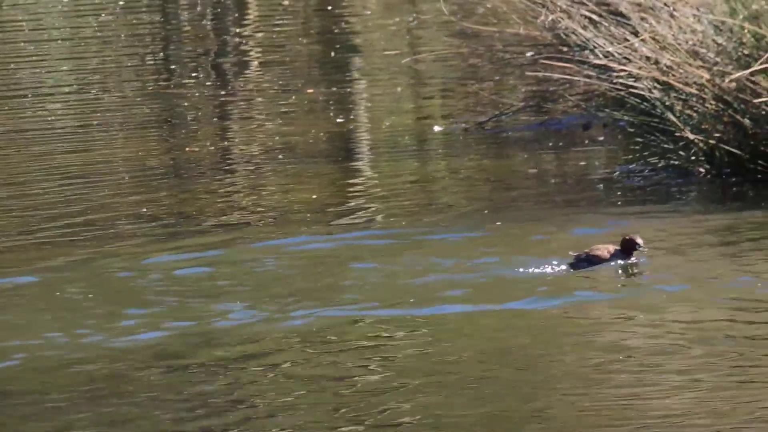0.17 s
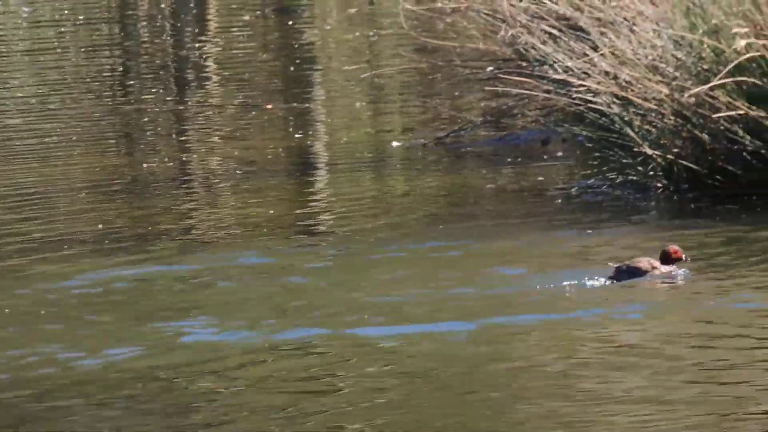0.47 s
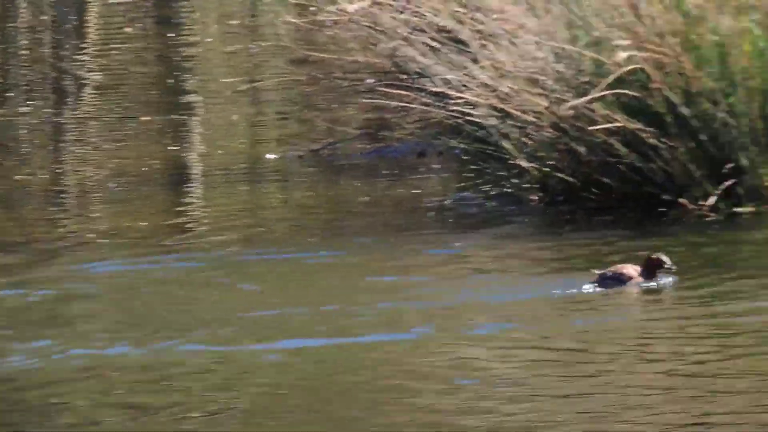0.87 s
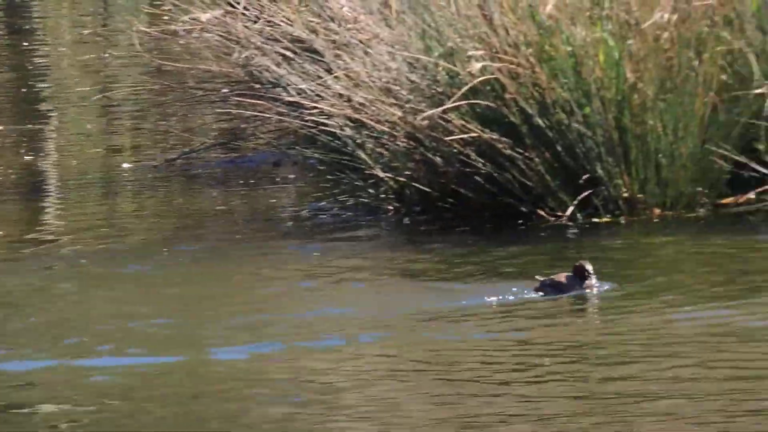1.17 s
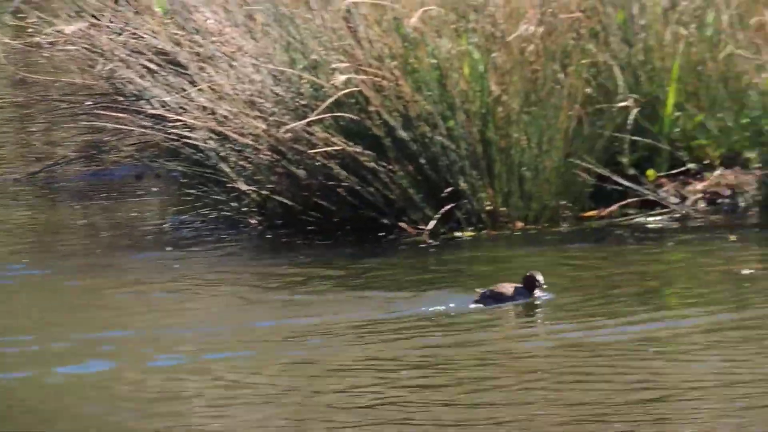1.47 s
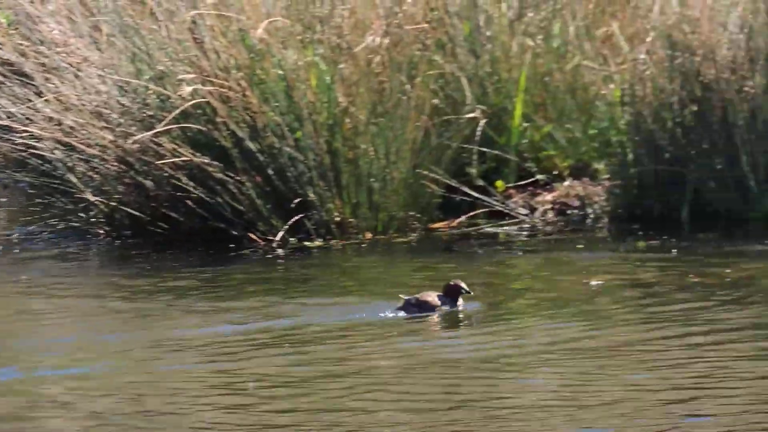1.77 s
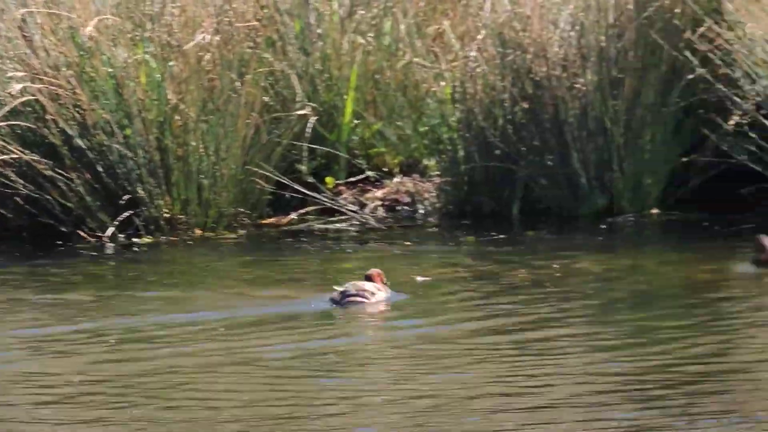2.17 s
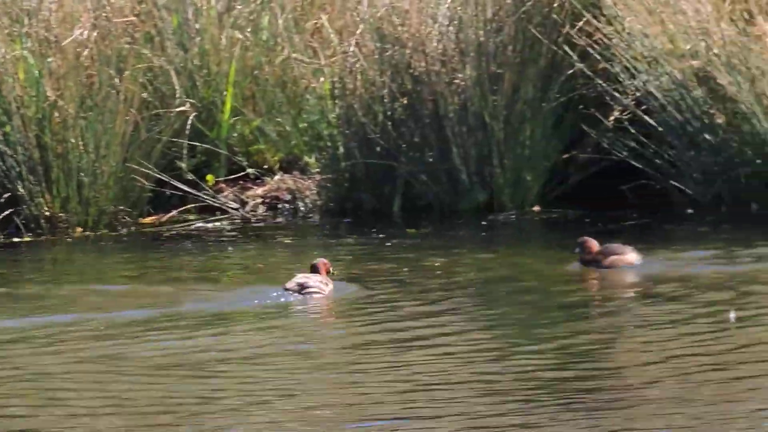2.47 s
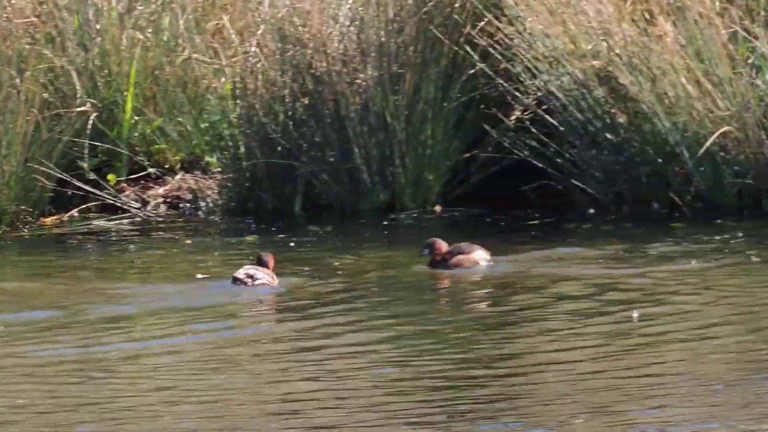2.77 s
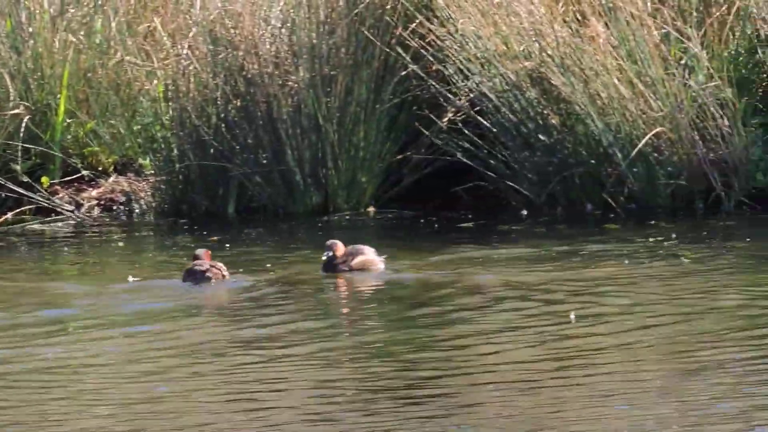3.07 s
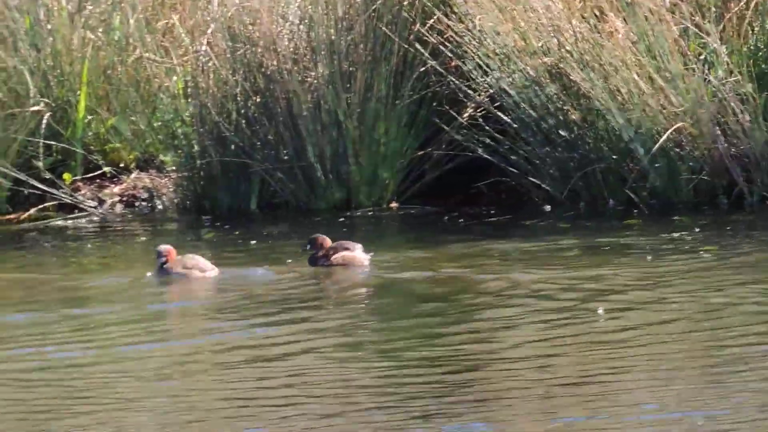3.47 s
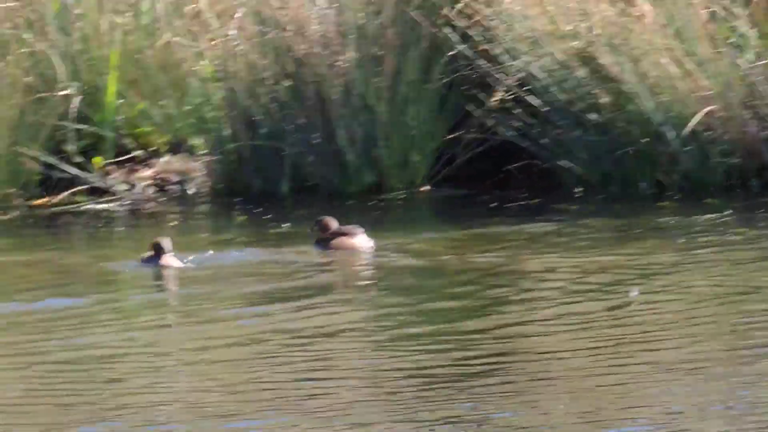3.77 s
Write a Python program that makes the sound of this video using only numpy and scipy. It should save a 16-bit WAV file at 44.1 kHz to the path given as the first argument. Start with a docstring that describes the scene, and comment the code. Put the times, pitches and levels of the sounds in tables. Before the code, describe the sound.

Fast bubbling grebe trills, pausing briefly midway then resuming stronger, with faint rumble and small clicks.

```python
"""Two little grebes trill in duet on a pond: arched chirps rich in harmonics alternate with level peeps,
among softer chirps and a few thin whistles. Each is a short harmonic tone with its own pitch glide.
Reeds and banks add decaying noise echoes. The camera body clicks twice, each time a double tick of ringing
modes and a crack. Underneath lie coloured noise for distant traffic, wind and hiss, and a far engine's sines."""
import sys
import numpy as np
from scipy import signal
from scipy.fft import rfft, irfft
from scipy.io import wavfile
from scipy.ndimage import uniform_filter1d

SR = 44100
rng = np.random.default_rng(int(sys.argv[2]) if len(sys.argv) > 2 else 0)


def master(y):
    """Save y as 16-bit WAV."""
    cut = np.clip(np.atleast_2d(y).T, -1, 1)
    pcm = np.round(cut * 32767)  # scale
    wavfile.write(sys.argv[1], SR, pcm.astype(np.int16))


N = 173313


def undb(db):
    """Decibels to gain."""
    return 10 ** (np.asarray(db) / 20)


def along(hz, table, axis=1):
    """Read a table column on a log-frequency axis."""
    table = np.array(table, float)
    return np.interp(np.log(np.maximum(hz, 1)), np.log(table[:, 0]), table[:, axis])


def walk(rate_hz, size=N):
    """Smooth random wander of spread near 1."""
    k = max(int(SR / rate_hz), 1)
    steps = np.repeat(rng.standard_normal(size // k + 3), k)
    return np.sqrt(3 / 2) * uniform_filter1d(steps, k)[k:k + size]


def add(out, sound, start_s):
    """Mix a sound in at a time."""
    i = max(int(start_s * SR), 0)
    n = max(min(sound.shape[-1], N - i), 0)
    out[..., i:i + n] += sound[..., :n]


def pan(balance_db):
    """Left and right gains, balance_db apart."""
    return undb(np.array([[balance_db], [-balance_db]]) / 2)


def noise(spectrum, skirt_db):
    """Unit noise of a given colour, falling by skirt_db an octave outside its range."""
    hz = np.maximum(np.arange(N // 2 + 1) * SR / N, 1)
    octaves_outside = abs(np.log2(hz / np.clip(hz, spectrum[0][0], spectrum[-1][0])))
    gain = undb(along(hz, spectrum) - skirt_db * octaves_outside)
    x = irfft(rfft(rng.standard_normal(N)) * gain, N)
    return x / x.std()


def spread(spectrum, skirt_db, side_db, pan_db):
    """Stereo noise from a shared and an opposed part."""
    side = undb(side_db) * noise(spectrum, skirt_db)
    middle = noise(spectrum, skirt_db)
    return (middle + np.array([side, -side])) * pan(pan_db)


# hiss colour: f/Hz, relative density/dB
HISS_COLOUR = [(1000, -10), (1320, -7), (1940, -7.5), (2290, -13.5), (4390, -20), (5240, -14),
               (6180, -21.5), (8330, -24.5), (14000, -27.5)]
HISS_DB = -50


def hiss():
    """Steady broadband noise, wide in stereo."""
    return spread(HISS_COLOUR, skirt_db=25, side_db=-2.4, pan_db=0.5) * undb(HISS_DB)


# wind colour: f/Hz, relative density/dB
WIND_COLOUR = [(20, -2.5), (59, 6), (89, -3), (110, -4.5), (150, -35)]
WIND_DB, WIND_WANDER_DB, WIND_WANDER_HZ = -48, 2.5, 6.7


def wind():
    """Low rumble of noise with an uneven level."""
    level_db = WIND_DB + WIND_WANDER_DB * walk(WIND_WANDER_HZ)
    return spread(WIND_COLOUR, skirt_db=16, side_db=-13.5, pan_db=3.5) * undb(level_db)


# traffic colour: f/Hz, relative density/dB
TRAFFIC_COLOUR = [(59, -53), (100, -6), (146, -6.5), (210, -3), (291, -8.5), (364, 0), (490, -4),
                  (577, 0.5), (1000, -4), (1300, -17), (2200, -120)]
TRAFFIC_MIDWAY_DB, TRAFFIC_RISE_DB_PER_S = -39.5, 0.5
TRAFFIC_WANDER_DB, TRAFFIC_WANDER_HZ = 1.44, 18


def traffic():
    """Far traffic as low noise that slowly grows and wavers."""
    rise_db = TRAFFIC_RISE_DB_PER_S * (np.arange(N) - N / 2) / SR
    level_db = TRAFFIC_MIDWAY_DB + rise_db + TRAFFIC_WANDER_DB * walk(TRAFFIC_WANDER_HZ)
    return spread(TRAFFIC_COLOUR, skirt_db=22, side_db=-13, pan_db=0.95) * undb(level_db)


# engine lines: f/Hz, rms level/dB
ENGINE_LINES = [(84, -54.5), (201, -64), (351, -61.5), (377, -56.5)]
ENGINE_WAVER_HZ, ENGINE_WAVER_RATE_HZ = 2.58, 10


def far_engine():
    """Distant motor as a few sines wavering in pitch."""
    out = np.zeros(N)
    for hz, db in ENGINE_LINES:
        pitch_hz = hz + ENGINE_WAVER_HZ * walk(ENGINE_WAVER_RATE_HZ)
        out += np.sqrt(2) * undb(db) * np.sin(2 * np.pi * np.cumsum(pitch_hz) / SR)
    return out


# camera ticks: t/s, ring gain/dB, crack gain/dB, contact cut-off f/Hz
CLICKS = [(0.7045, -10, -26.5, 5900), (0.732, -10, -23, 3020), (3.275, -15, -28, 4450),
          (3.2847, -15, -35, 5440)]
# camera body modes: f/Hz, relative level/dB, t60/s
BODY_MODES = [(410, -28.5, 0.021), (1400, -24.5, 0.0041), (1538, -4.5, 0.017), (3300, -14, 0.008),
              (5030, -14, 0.0083)]
CLICK_PAN_DB, CRACK_DECAY_S = 7, 0.0015


def camera_clicks():
    """A tiny crack and a short ring of body modes; a softer contact has a lower cut-off."""
    out, t = np.zeros((2, N)), np.arange(SR // 10) / SR
    ring = np.zeros(len(t))
    for hz, db, t60_s in BODY_MODES:
        ring += undb(db) * np.sin(2 * np.pi * hz * t) * np.exp(-np.log(1000) * t / t60_s)
    for s, ring_db, crack_db, cutoff_hz in CLICKS:
        crack = undb(crack_db) * rng.standard_normal(len(t)) * np.exp(-t / CRACK_DECAY_S)
        contact = signal.butter(2, cutoff_hz, fs=SR, output="sos")
        knock = signal.sosfilt(contact, undb(ring_db) * ring + crack)
        add(out, knock * pan(CLICK_PAN_DB), s)
    return out


def echo(x, tail, level_db):
    """Convolve with a stereo tail of unit energy per side."""
    tail = tail / np.sqrt((tail ** 2).sum(1, keepdims=True))
    return undb(level_db) * signal.fftconvolve(x[None], tail, axes=1)[:, :N]


BANK_T60_S, BANK_DB, BANK_BUILDUP_S = 0.42, -10, 0.057


def banks(x):
    """Reeds and trees round the pond scatter a soft tail that builds up, then decays."""
    t = np.arange(SR) / SR
    envelope = np.exp(-np.log(1000) * t / BANK_T60_S) * (1 - np.exp(-t / BANK_BUILDUP_S))
    return echo(x, rng.standard_normal((2, SR)) * envelope, BANK_DB)


REED_T60_S, REED_DB = 0.027, -7.5


def reeds(x):
    """Close stems throw back a quick scatter of echoes that breaks up the glides."""
    t = np.arange(SR // 10) / SR
    envelope = np.exp(-np.log(1000) * t / REED_T60_S)
    return echo(x, rng.standard_normal((2, len(t))) * envelope, REED_DB)


# microphone ports, left against right: f/Hz, full level difference/dB, left phase lead/rad
PORTS = [(940, 4, -0.15), (1380, 17.5, 0), (1690, 9, -0.5), (1870, 18.5, 0.5), (2210, -8, -1.7),
         (2885, -2.5, -0.84), (3233, -8, -3), (3310, 7, -1.78), (4200, 5, -2.5), (4734, -4.5, -2),
         (5074, -14, -7.5), (6400, -35, -11)]


def ports(x, share):
    """Each port favours its own frequencies, by a share of the full dB; the left hears treble later."""
    hz = np.arange(N // 2 + 1) * SR / N
    ratio = undb(share * along(hz, PORTS))
    left = ratio * np.exp(1j * along(hz, PORTS, axis=2))
    gains = np.array([left, np.ones(len(hz))]) * np.sqrt(2 / (1 + ratio ** 2))
    return irfft(rfft(x) * gains, N)


HARMONICS, HARMONIC_SCATTER_DB, BRIGHT_SWELL, JITTER_RATE_HZ = 8, 2, 0.45, 700


def note_time():
    """Seconds about the middle of a note."""
    return np.arange(-1600, 1600) / SR


def add_note(out, sound, middle_s):
    """Mix a note in by its middle."""
    add(out, sound, middle_s + note_time()[0])


def note(pitch_hz, half_s, edge_s, throat, jitter, harmonics_db=0):
    """Slightly unsteady harmonic tone, shaped by the throat, brightest where it is loudest."""
    u = note_time()
    pitch_hz = pitch_hz * (1 + jitter * walk(JITTER_RATE_HZ, size=len(u)))
    k = np.arange(1, HARMONICS + 1)[:, None]
    phase = 2 * np.pi * (k * np.cumsum(pitch_hz) / SR + rng.random(k.shape))
    scatter_db = HARMONIC_SCATTER_DB * rng.standard_normal(k.shape)
    gain = undb(along(k * pitch_hz, throat) + np.c_[harmonics_db] + scatter_db)
    swell = np.sin(np.pi / 2 * np.clip((half_s - abs(u)) / edge_s + .5, 0, 1)) ** 2
    # higher harmonics swell more sharply
    swells = swell ** (1 + BRIGHT_SWELL * (k - 1))
    return np.sqrt(2) * (swells * gain * np.sin(phase)).sum(0)


# whistles: middle t/s, length/s, middle f/Hz, relative level/dB
WHISTLES = [(0.142, 0.012, 2680, -37), (0.356, 0.013, 2610, -34), (0.429, 0.032, 2530, -40),
            (1.936, 0.036, 2080, -43.5), (2.037, 0.027, 2366, -42), (2.138, 0.0091, 2510, -36),
            (2.167, 0.011, 2630, -35.5), (2.22, 0.01, 2490, -35.5), (2.287, 0.021, 2360, -43),
            (2.562, 0.01, 2587, -30.5), (2.629, 0.0098, 2585, -32.5)]
# whistle throat: f/Hz, gain/dB
WHISTLE_THROAT = [(2600, -1.5), (4800, -4), (5400, -14.5), (9000, -36.5)]
WHISTLE_SAG_PER_S, WHISTLE_JITTER = 1.277, 0.011


def whistles():
    """Thin notes whose pitch sags a little."""
    out = np.zeros(N)
    for s, length_s, hz, db in WHISTLES:
        pitch_hz = hz * (1 - WHISTLE_SAG_PER_S * note_time())
        half_s = length_s / 2
        add_note(out, undb(db) * note(pitch_hz, half_s, half_s, WHISTLE_THROAT, WHISTLE_JITTER), s)
    return out


# chirp harmonics from the first up, the fifth strongest: gain/dB
CHIRP_HARMONICS_DB = [-2, 1, 2.5, 2.5, 6, 1, -1, 1.5]
# chirp throat: f/Hz, gain/dB
CHIRP_THROAT = [(930, -12.5), (1150, -2.5), (1900, -3), (2300, -9.5), (2600, -3), (3150, -10.5),
                (3600, -2.5), (3900, -10.5), (4300, -15), (4800, -13.5), (5700, -18.5), (6450, -14.5),
                (7000, -21.5), (7700, -22), (11000, -83)]
CHIRP_HALF_S, CHIRP_EDGE_S, CHIRP_JITTER = 0.018, 0.02, 0.012
ARCH_S, ARCH_DEPTH = 0.01, 0.6  # ARCH_DEPTH: limit of the drop, share of top pitch


def chirp(top_hz, drop):
    """Pitch rises to a top and falls; drop is about the share lost ARCH_S from the top."""
    arch = np.tanh(drop * (note_time() / ARCH_S) ** 2 / ARCH_DEPTH)
    pitch_hz = top_hz * (1 - ARCH_DEPTH * arch)
    return note(pitch_hz, CHIRP_HALF_S, CHIRP_EDGE_S, CHIRP_THROAT, CHIRP_JITTER, CHIRP_HARMONICS_DB)


# soft chirps, interpolated in time: t/s, top f/Hz, relative level/dB
SOFT_CURVE = [(.2, 1294, -46), (.62, 1203, -38.5), (.9, 1168, -44.5), (1.6, 1185, -42.5), (1.77, 890, -48),
              (2.301, 1163, -39), (2.449, 992, -41), (2.999, 923, -40.5), (3.252, 837.5, -43.5)]
SOFT_LAG_S, SOFT_DROP, SWAP_S = 0.0335, 0.09, 2.3


def soft_chirps():
    """A soft chirp follows each arched chirp before SWAP_S, each peep after it."""
    out = np.zeros(N)
    leads_s = [row[0] for row in ARCHED_CHIRPS if row[0] < SWAP_S]
    leads_s += [row[0] for row in PEEPS if row[0] > SWAP_S]
    curve_s, curve_hz, curve_db = np.array(SOFT_CURVE).T
    for s in np.array(leads_s) + SOFT_LAG_S:
        top_hz = np.interp(s, curve_s, curve_hz)
        gain = undb(np.interp(s, curve_s, curve_db))
        add_note(out, gain * chirp(top_hz, SOFT_DROP), s)
    return out


# arched chirps: middle t/s, top f/Hz, level before CHIRP_GAIN_DB/dB, drop (share of top pitch)
ARCHED_CHIRPS = [(0.105, 1281, -39.5, 0.21), (0.176, 1334, -38, 0.21), (0.248, 1281, -36.5, 0.19),
                 (0.3225, 1337, -36.5, 0.22), (0.398, 1251, -35.5, 0.2), (0.471, 1113, -36.5, 0.17),
                 (0.5435, 1163, -37.5, 0.18), (0.614, 1114, -40.5, 0.14), (0.6847, 1177, -39, 0.19),
                 (0.757, 1127, -41, 0.17), (0.8255, 1110, -43.5, 0.13), (0.898, 1117, -40, 0.17),
                 (0.972, 1132, -38.5, 0.16), (1.0435, 1133, -39, 0.19), (1.1123, 1076, -39, 0.19),
                 (1.185, 1093, -40.5, 0.17), (1.256, 1053, -40, 0.19), (1.33, 978, -37.5, 0.073),
                 (1.409, 983, -37, 0.1), (1.4885, 989, -39.5, 0.12), (1.5741, 1003, -37.5, 0.096),
                 (1.639, 883, -41.5, 0.066), (1.7345, 759, -46.5, 0.06), (2.0291, 804, -47, 0.055),
                 (2.102, 1286, -39.5, 0.17), (2.154, 910, -42.5, 0.1), (2.248, 1356, -39, 0.25),
                 (2.272, 1225, -36, 0.093), (2.381, 1175, -36.5, 0.089), (2.488, 1227, -36, 0.17),
                 (2.5792, 1279, -37.5, 0.13), (2.6793, 1292, -36.5, 0.098), (2.7674, 1310, -35, 0.091),
                 (2.854, 1320, -35.5, 0.12), (2.9455, 1321, -36.5, 0.21), (3.0334, 1345, -38, 0.11),
                 (3.12, 1330, -38.5, 0.17), (3.205, 1328, -38, 0.12), (3.295, 1300, -37, 0.17),
                 (3.385, 1283, -37.5, 0.19), (3.4664, 1265, -38, 0.17), (3.554, 1269, -37, 0.19),
                 (3.6424, 1236, -37.5, 0.2), (3.733, 1241, -39.5, 0.23), (3.828, 1087, -40, 0.095),
                 (3.916, 1080, -42, 0.19)]
CHIRP_GAIN_DB = 0.86


def arched_chirps():
    """Harmonic-rich notes of the trill, each with its own arch."""
    out = np.zeros(N)
    for s, top_hz, db, drop in ARCHED_CHIRPS:
        add_note(out, undb(db + CHIRP_GAIN_DB) * chirp(top_hz, drop), s)
    return out


# peeps: middle t/s, target f/Hz, level before PEEP_GAIN_DB/dB
PEEPS = [(0.132, 1670, -32.5), (0.208, 1624, -34), (0.2842, 1634, -30.5), (0.3469, 1592, -41.5),
         (0.4991, 1610, -33), (0.5742, 1640, -32), (0.645, 1590, -33), (0.717, 1530, -31),
         (0.787, 1560, -34), (0.8588, 1570, -34), (0.933, 1565, -33), (1.002, 1550, -31.5),
         (1.073, 1556, -30), (1.1427, 1562, -31), (1.2137, 1510, -34), (1.285, 1456, -39),
         (2.2083, 1540, -41.5), (2.351, 1530, -35), (2.4197, 1650, -32), (2.4884, 1600, -32),
         (2.549, 1610, -31.5), (2.617, 1603, -30.5), (2.6896, 1602, -30), (2.756, 1592, -32),
         (2.8221, 1610, -27), (2.8899, 1617, -29), (2.956, 1603, -28.5), (3.0221, 1600, -31),
         (3.091, 1608, -27.5), (3.154, 1560, -30.5), (3.213, 1598, -30), (3.2783, 1620, -30.5),
         (3.343, 1633, -31.5), (3.4075, 1584, -31.5), (3.472, 1555, -33), (3.539, 1560, -34.5),
         (3.6042, 1547, -37.5), (3.686, 1496, -36.5), (3.762, 1483, -38), (3.8432, 1440, -43)]
# peep climb through the trill: t/s, climb (share of target pitch)
PEEP_CLIMB = [(.13, 0.12), (.21, 0.037), (1.2, 0.045), (1.3, 0.18), (2.42, 0.055), (2.55, 0.18),
              (2.62, 0.26), (2.69, 0.042), (3.12, .04), (3.8, 0.22)]
# peep throat: f/Hz, gain/dB
PEEP_THROAT = [(1550, -5), (3100, -2), (4700, -17.5), (6300, -22), (9000, -50)]
PEEP_GAIN_DB, PEEP_JITTER = 1.34, 0.011
PEEP_FULL_HALF_S, PEEP_EDGE_S, SHORTEN_PER_CLIMB = 0.011, 0.01, 1.49
SCOOP, END_DROP, SCOOP_S = 0.04, 0.01, 0.00302  # SCOOP, END_DROP: shares of target pitch


def peeps():
    """Notes scoop up to a briefly held pitch; a longer climb makes a shorter note."""
    out, u = np.zeros(N), note_time()
    climb_s, climb_share = np.array(PEEP_CLIMB).T
    for s, hz, db in PEEPS:
        climb = np.interp(s, climb_s, climb_share)
        half_s = PEEP_FULL_HALF_S * (1 - SHORTEN_PER_CLIMB * climb)
        to_go = np.clip(.5 - u / (2 * PEEP_FULL_HALF_S), 0, 2)
        end_depth = np.where(u < 0, SCOOP, END_DROP)
        ends = end_depth * np.exp(np.minimum((abs(u) - half_s) / SCOOP_S, 2))
        pitch_hz = hz * (1 - climb * to_go ** 2 - ends)
        peep = note(pitch_hz, half_s, PEEP_EDGE_S, PEEP_THROAT, PEEP_JITTER)
        add_note(out, undb(db + PEEP_GAIN_DB) * peep, s)
    return out


DIRECT_SHARE, ECHO_SHARE = 0.57, 0.56  # of the PORTS level difference


def scene():
    """The duet, direct and off reeds and banks, over clicks and background."""
    background = hiss() + wind() + traffic() + far_engine()
    birds = whistles() + soft_chirps() + arched_chirps() + peeps()
    direct = ports(birds, DIRECT_SHARE)
    echoes = ports(reeds(birds) + banks(birds), ECHO_SHARE)
    return background + camera_clicks() + echoes + direct


START_S, TOP_HZ = 0.106, 14300


def record(dry):
    """Silence until START_S, then sound with the treble cut steeply above TOP_HZ."""
    live = np.arange(N) / SR > START_S
    low_pass = signal.ellip(10, .2, 70, TOP_HZ, fs=SR, output="sos")
    return signal.sosfilt(low_pass, dry * live)


dry = scene()
out = record(dry)
master(out)
```